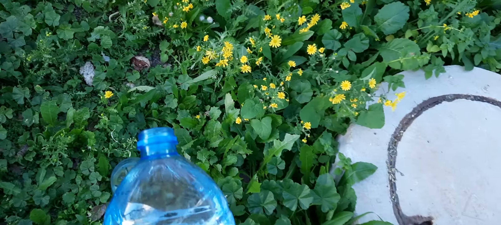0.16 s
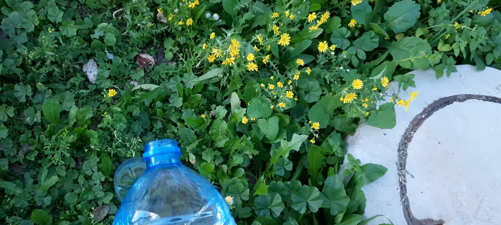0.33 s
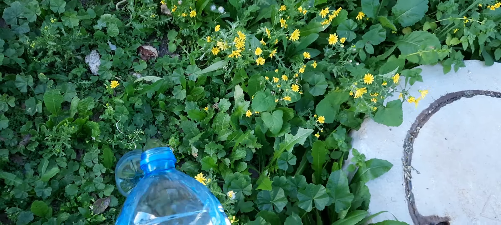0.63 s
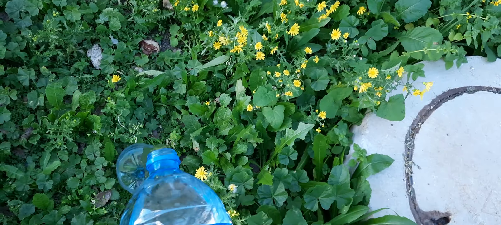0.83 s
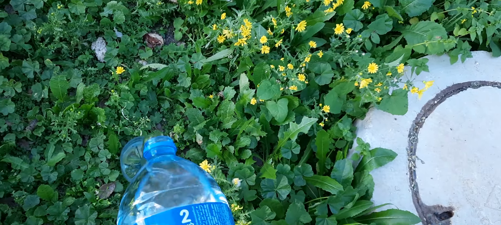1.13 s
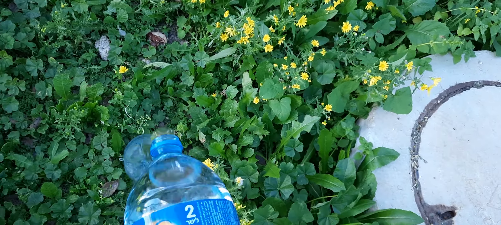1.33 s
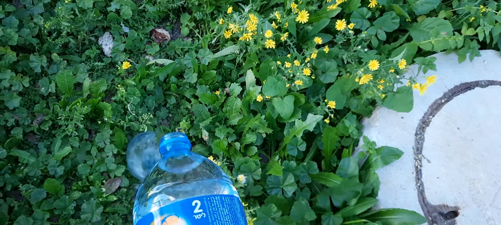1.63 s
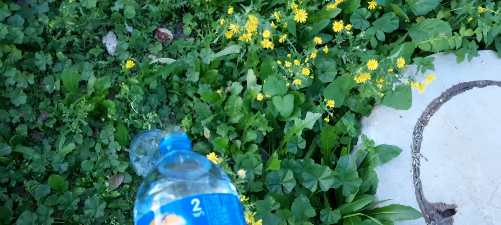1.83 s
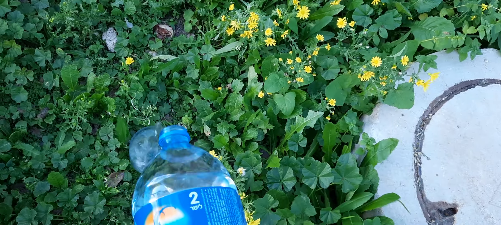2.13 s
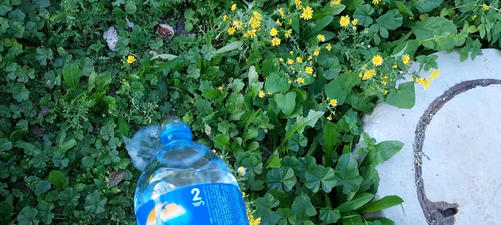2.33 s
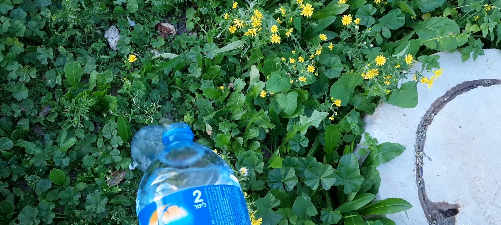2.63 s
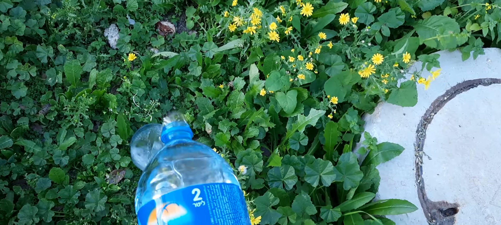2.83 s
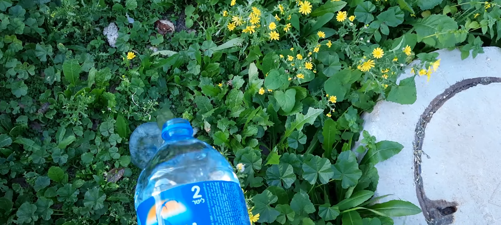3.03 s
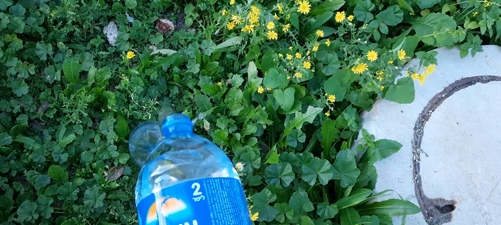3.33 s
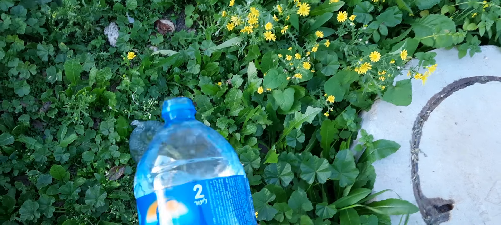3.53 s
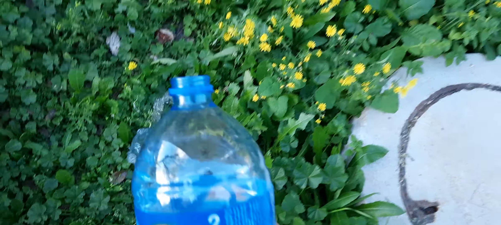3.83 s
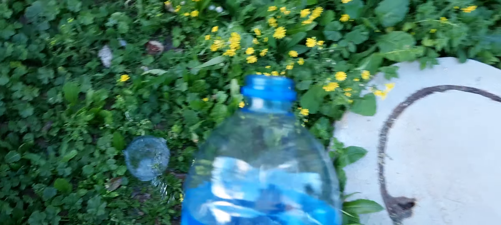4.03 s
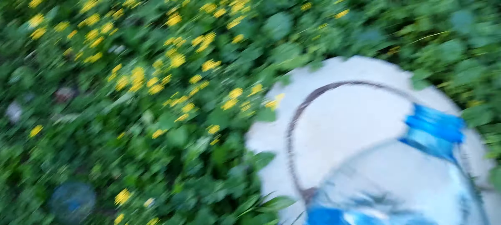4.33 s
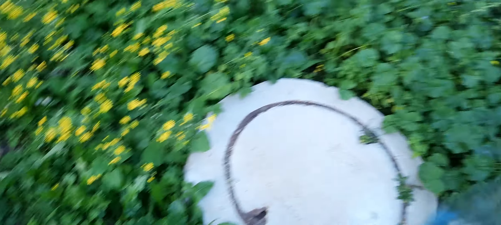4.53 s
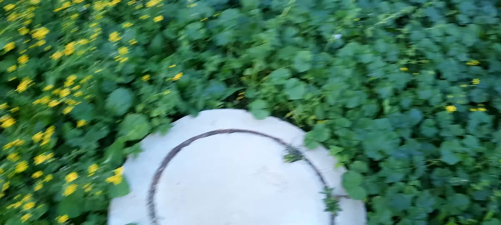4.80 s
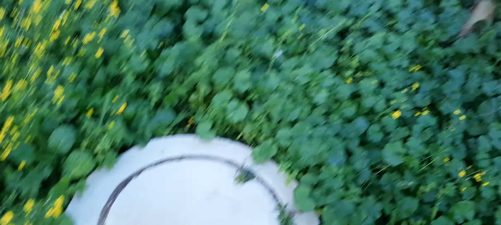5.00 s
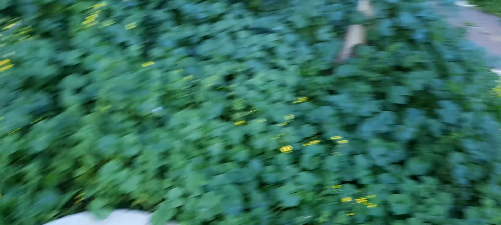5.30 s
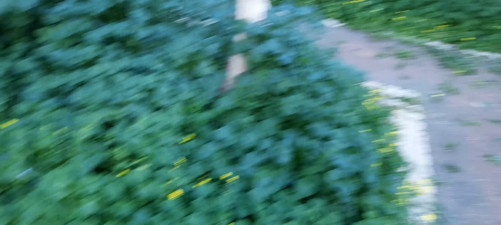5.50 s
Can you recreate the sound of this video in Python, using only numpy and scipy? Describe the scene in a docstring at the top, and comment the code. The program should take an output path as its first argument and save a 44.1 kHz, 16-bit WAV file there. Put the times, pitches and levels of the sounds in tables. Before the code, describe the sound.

Outdoors, quiet distant traffic and light wind lead into water pouring from a large plastic bottle into a small dish. Sharp splats come first, then uneven bubbly glugs, bright spray and droplets ticking on leaves. Low bumps join midway. A loud hollow plastic pop marks the end of the pour, then leaves rustle and a far engine rises. Close stereo microphone, water slightly left.

```python
"""Outdoors among leaves, a large plastic bottle is poured into a small dish close to a two-port microphone.
Bubbles are damped sines that rise in pitch; drops are bursts of bright noise and sharp pings, over a spray hiss.
The bottle pops back into shape as a set of ringing modes; wind on the ports is low noise, and wind and the
handled bottle give low thumps. Far off, traffic is filtered noise with narrow resonances; an engine pulls
away as a gliding note with a whirr."""
import sys
import numpy as np
from scipy import signal
from scipy.fft import rfft, irfft
from scipy.io import wavfile

SR = 44100
rng = np.random.default_rng(int(sys.argv[2]) if len(sys.argv) > 2 else 0)


def store_wav(level_fs):
    """Save 16-bit WAV to argv[1]."""
    pcm = np.round(np.clip(np.atleast_2d(level_fs), -1, 1) * 32767)
    wavfile.write(sys.argv[1], SR, pcm.T.astype(np.int16))


N = 249493

# Flow of the pour, as spray level: (time [s], level [dB])
POUR_FLOW = [(.82, -66.5), (1.03, -59), (1.08, -51.5), (1.18, -59.5), (1.26, -51), (1.47, -58), (1.53, -48),
             (1.65, -59), (1.85, -49.5), (2.1, -55.5), (2.2, -54.5), (2.32, -55), (2.6, -53.5),
             (2.72, -49.5), (2.82, -54.5), (3.03, -50.5), (3.13, -61), (3.22, -52), (3.32, -53.5),
             (3.46, -53.5), (3.85, -52), (3.96, -59), (4.1, -51), (4.2, -67)]
# Loudest bubbles, before the dish thins their bass: (time [s], level [dB], starting pitch [Hz])
LOUD_BUBBLES = [(1.078, -19, 1673), (1.0784, -17.5, 3200), (1.217, -27, 1500), (1.279, -24.5, 1490),
                (1.293, -35, 1770), (1.327, -28.5, 1450), (1.5427, -26.5, 2900), (1.554, -35, 2410),
                (1.586, -34, 1450), (1.603, -34, 1830), (1.647, -31.5, 1480), (1.858, -27, 1670),
                (1.911, -33, 1550), (1.983, -26.5, 2450), (2.0394, -25.5, 1470), (2.0663, -29.5, 2450),
                (2.1583, -21, 1770), (2.232, -26.5, 2860), (2.2407, -26.5, 2430), (2.275, -34.5, 1770),
                (2.3824, -26, 2030), (2.3946, -26.5, 2500), (2.6146, -27.5, 1530), (2.665, -32, 1500),
                (2.684, -31, 1440), (2.687, -31, 1750), (2.697, -29, 1460), (2.739, -30, 2460),
                (2.758, -27.5, 1750), (2.7828, -33, 2450), (2.9112, -28, 2530), (3.028, -22, 1420),
                (3.0732, -27, 1510), (3.112, -26, 1640), (3.187, -28, 2720), (3.262, -32.5, 1950),
                (3.306, -30, 1760), (3.32, -21.5, 1430), (3.3495, -33, 2440), (3.363, -28, 1504),
                (3.397, -27.5, 1390), (3.62, -26.5, 1620), (3.6546, -23, 1600), (3.8599, -23, 1600),
                (3.884, -28, 1450)]
# Clusters of bubbles in the dish, one to each glug: (start [s], hold [s], level [dB])
GLUGS = [(1.212, 0.033, -46), (1.249, 0.055, -44.5), (1.5, 0.0083, -44.5), (1.65, .01, -41.5),
         (1.81, 0.05, -48), (1.976, 0.041, -47), (2.16, 0.042, -48), (2.49, 0.053, -45.5),
         (2.662, 0.016, -39.5), (2.745, 0.028, -47), (2.835, 0.2, -48.5), (3.148, 0.017, -51),
         (3.257, 0.089, -44), (3.57, 0.085, -43.5), (3.693, 0.034, -46.5), (3.848, 0.04, -43),
         (4.015, 0.048, -42)]
# Pitches the dish favours for small bubbles: (share of bubbles below [0-1], pitch [Hz])
DISH_PITCHES = [(0, 1260), (.48, 1560), (.54, 1700), (.82, 1950), (.85, 2320), (.95, 2560), (1, 3100)]
# Dish modes that a loud bubble knocks: (pitch [Hz], mean level under the bubble [dB], t60 [s])
DISH_MODES = [(1485, -21.5, 0.022), (1764, -18, 0.04), (2430, -16, 0.018), (3070, -12, 0.0093)]
# Loudest splats: (time [s], level [dB], share of the top octave [dB])
SPLATS = [(0.8926, -31, 7), (0.914, -28.5, 2), (0.948, -27, 1), (0.9695, -32, 0), (1.0667, -32, 1),
          (1.078, -24.5, -7), (1.0998, -35, -5), (1.111, -31, 1), (1.1192, -35, -6), (1.1348, -27, -2),
          (1.291, -31, -4), (1.375, -30, -15), (1.3968, -30, -6), (1.4135, -26.5, 1), (1.451, -40, 0),
          (1.591, -25.5, -17), (1.6265, -26.5, -3), (1.653, -27.5, -8), (1.692, -30, -7), (1.713, -31, -3),
          (1.7941, -21, -3), (1.896, -42, 1), (1.9046, -22, -1), (2.131, -34.5, -4), (2.2027, -19.5, -6.5),
          (2.241, -17, 3.5), (2.305, -34, 0), (2.32, -30.5, -10), (2.475, -30, -10), (2.5327, -28.5, -27),
          (2.598, -31, 1), (2.606, -33, -0.5), (2.7124, -24.5, -23), (2.8987, -28, -1),
          (3.1757, -29.5, -25), (3.2514, -39, -2), (3.281, -27.5, -8), (3.3313, -26, 0), (3.3653, -36, 0),
          (3.42, -47, 2), (3.498, -26, 4), (3.524, -27, 0), (3.5452, -32, 1), (3.677, -23.5, -2.5),
          (3.751, -37, -14), (3.896, -30.5, 10), (3.916, -33, 1), (3.928, -33, 0), (3.942, -30.5, -6),
          (3.978, -31, 1), (4.03, -19, -6), (4.057, -39, -1), (4.1506, -31.5, -6)]
# Colour of bursting drops: (frequency [Hz], relative level per Hz [dB])
SPRAY_COLOUR = [(900, -33), (2000, -0.5), (3500, 0.5), (5500, 4.5), (6400, -3), (7600, 6.5), (8500, 3),
                (9200, -17), (12000, -3), (14000, -2.5), (15600, -4.5)]
# Snaps of the bottle wall: (time [s], level [dB], brightness [dB per octave], low-mode level [dB])
BOTTLE_POPS = [(1.508, -34, 8, 2), (1.522, -33, -3, 7.5), (3.7071, -23, 7.5, -11), (4.0607, -8.5, -2, -5.5)]
# Modes of the bottle: (pitch [Hz], relative level [dB], t60 [s])
BOTTLE_MODES = [(306, -9, 0.051), (1100, 2, 0.0029), (1400, -3.5, 0.01), (1910, -6, 0.008),
                (2220, -5, 0.008), (3090, 1, 0.0027)]
# Wind on the ports: (time [s], relative level [dB])
WIND_FLOW = [(0, -55.5), (.37, -62), (.43, -46), (.68, -50), (.78, -60), (1.0, -51), (1.33, -51.5),
             (1.46, -64), (1.51, -45), (1.75, -54.5), (1.9, -46), (2.14, -58), (2.4, -52.5), (2.88, -42.5),
             (3.4, -44), (3.65, -48.5), (3.85, -43.5), (4.2, -50.5), (5.66, -53)]
# Low thumps, of wind and of the handled bottle:
# (time [s], peak level [dB], pitch at the peak [Hz], width of the rise [s])
LOW_THUMPS = [(1.52, -41, 60.4, 0.008), (2.735, -34, 102, 0.0035), (2.879, -19.5, 100.5, 0.0057),
              (3.051, -34, 70.4, 0.0088), (3.328, -29, 138, 0.0071), (3.366, -21, 150, 0.0019),
              (3.384, -27.5, 87.5, 0.0075), (3.476, -24, 111, 0.0011), (3.494, -23, 114, 0.0051),
              (3.555, -27, 104, 0.0049), (3.802, -35, 55.7, 0.022), (3.838, -23, 259, 0.007),
              (3.858, -17.5, 420, 0.0022), (3.861, -30.5, 122, 0.0062), (4.05, -29, 74, 0.008),
              (4.108, -27, 295, 0.004), (5.553, -33, 61.6, 0.018)]
# Engine note that dips, climbs and drops back: (time [s], pitch [Hz], level [dB])
ENGINE_CLIMB = [(3.65, 58, -52), (3.762, 55.8, -46), (3.89, 54.2, -48.5), (4.332, 60.34, -30.5),
                (4.726, 63.9, -37), (5.312, 69.74, -38), (5.45, 64.4, -29)]
# Engine note that joins later: (time [s], pitch [Hz], level [dB])
ENGINE_JOIN = [(4.85, 86.6, -49), (5.04, 90.8, -38), (5.538, 90.86, -31.5), (5.657, 96.3, -37)]
# Engine overtones: (multiple of the note [1], mean level under the note [dB])
ENGINE_OVERTONES = [(2, -19), (3, -21.5), (4, -33)]
# Tyre whirr of the vehicle pulling away: (time [s], centre pitch [Hz], relative level [dB])
PASSING = [(4.15, 1049, -64), (4.5, 1020, -56), (4.9, 863, -56.5), (5.3, 850, -56), (5.66, 824, -67)]
# Leaves rustle as the walker turns away: (time [s], mean level [dB])
LEAF_RUSTLE = [(4.17, -63), (4.31, -50.5), (4.44, -61.5), (4.77, -60.5), (5.07, -62.5), (5.36, -50),
               (5.57, -53), (5.63, -59)]
# Far traffic: (time [s], relative drone level [dB], relative tyre hiss level [dB])
FAR_TRAFFIC = [(0, -59.5, -53.5), (.5, -49, -54), (1.0, -55.5, -53.5), (1.5, -51.5, -53.5), (2.3, -47, -51),
               (3.0, -50, -51), (3.8, -47, -50), (4.2, -47.5, -52), (4.5, -46.5, -51), (5.0, -47.5, -50.5),
               (5.4, -47.5, -50), (5.66, -51.5, -49)]
# Colour of the traffic roar: (frequency [Hz], relative level per Hz [dB])
ROAR_COLOUR = [(18, -57.5), (30, -62), (70, -1), (149, -28.5), (364, 3.5), (649, -22), (801, -22.5),
               (3490, -32.5), (8300, -28.5), (9220, -48), (13000, -35.5), (16000, -64)]
# Droning resonances: (frequency [Hz], width [Hz], mean level [dB])
DRONE_MODES = [(208.2, 16.3, -8), (294.4, 9.4, -7), (379, 5, -8.5), (438, 70, -11.5), (817, 16, -18),
               (841, 9.9, -22.5)]
# Left-right likeness of far sound: (frequency [Hz], likeness [0-1])
PORT_LIKENESS = [(60, 0.21), (130, 0.58), (290, 1), (640, 0.43), (1400, 0.0092), (8000, 0.01)]
# Colours of wind, tyre hiss, a separately swelling low band of it, and leaves:
# (frequency [Hz], relative level per Hz [dB])
WIND_COLOUR = [(20, -16), (35, -40), (50, 3.5), (85, 1.0), (150, -4.5), (300, -11.0), (800, -55.5)]
TYRE_COLOUR = [(120, -2.5), (250, -0.5), (500, -4.0), (900, -6.5), (1500, -9.5), (3000, -16.0), (6000, -34.5)]
SWELL_COLOUR = [(250, -28), (550, -7), (800, 5.5), (1150, -8.0), (1600, -19.5)]
LEAF_COLOUR = [(1500, -45), (4000, 2.5), (8000, 4.5), (9300, -4.0), (12000, 2.0), (15500, -0.5)]
SPRAY_EDGES_HZ = [900, 2900, 4400, 6400, 8900, 19500]

PORT_LAG_S, WATER_PAN_DB = 0.00012, 2   # the water is nearer the left port
DISH_EDGE_HZ = 1454   # the small dish radiates little below this
SNAP_DB = -6   # pinch-off of a loud bubble, under its ring
GLUG_ATTACK_S, GLUG_FADE_DB_PER_S = 0.0068, 279
TRICKLE_DB, TRICKLE_START_S, TRICKLE_END_S = -55, 1.2, 4.12   # thin bubbling between the glugs
TICK_DB, TICK_T60_S = 0, 0.0028   # sharp first contact of a splat
TICK_HZ = (7200, 13360)   # nominal tick pitch below and in the top octave
SPATTER_PER_S, SPATTER_DB = 70, -1.5   # nominal rate of lone droplets on leaves, level over the spray
SPATTER_LOW_HZ, SPATTER_HIGH_HZ = 2900, 13900   # range of starting pitch
BODY_HZ = 1230   # modes under this belong to the whole bottle, those above to the dent
THUMP_TAIL, THUMP_SAG = 1.14, 0.07   # fall over rise; pitch sag as a fraction
TOP_EDGE_HZ, CUTOFF_HZ = 15700, 16979


def gurgle(per_s, size_db):
    """Small bubbles crowd under the loudest ones; the dish radiates their treble better than their bass."""
    water = small_bubbles(per_s, size_db) + loud_bubbles()
    return signal.sosfilt(signal.butter(3, DISH_EDGE_HZ, "high", fs=SR, output="sos"), water)


def small_bubbles(per_s, size_db):
    """Overlapping bubble rings, mostly near the dish's favoured pitches, follow the glugs."""
    small = np.zeros(N)
    for when, size, pitch, ring in rng.random((round(6 * per_s), 4)):
        hz = np.interp(pitch, *np.transpose(DISH_PITCHES))
        cycles = 6 + 20 * ring ** 2
        one = bubble(hz, cycles / hz, 0.08)
        add(small, when * (N - 1) / SR, amp(-size_db * np.log(size + 0.023)) * one)
    return rms_one(small) * bubbling() * amp(4.1 * drift(22))


def loud_bubbles():
    """Each large bubble rings, knocks the dish modes and pinches off with a short, higher snap."""
    out = np.zeros(N)
    for s, db, hz in LOUD_BUBBLES:
        add(out, s, amp(db) * bubble(hz, 28.7 / hz, 0.036, attack_s=0.00049))
        for wall_hz, wall_db, t60 in DISH_MODES:
            knock = bubble(wall_hz, t60, 0, attack_s=0.0001)
            add(out, s, amp(db + wall_db + rng.normal(0, 3.8)) * knock)
        snap = bubble(2.43 * hz, 12.0 / hz, 0.3, attack_s=0.0001)
        add(out, s, amp(db + SNAP_DB) * snap)
    return out


def bubble(hz, t60, rise, attack_s=0.0002):
    """A damped sine whose pitch rises as the bubble nears the surface; with no rise, a struck mode."""
    t = np.arange(round(t60 * SR)) / SR
    envelope = (1 - np.exp(-t / attack_s)) * amp(-60 * t / t60)
    return envelope * np.sin(2 * np.pi * hz * t * (1 + rise * t / t60))


def bubbling():
    """Gain of the small bubbles: each glug swells quickly, holds and dies away over a thin trickle."""
    t = np.arange(N) / SR
    power = amp(TRICKLE_DB) ** 2 * (t > TRICKLE_START_S) * (t < TRICKLE_END_S)
    for s, hold_s, db in GLUGS:
        after = np.maximum(t - s - GLUG_ATTACK_S - hold_s, 0)
        swell = np.clip((t - s) / GLUG_ATTACK_S, 0, 1)
        power = power + (swell * amp(db - GLUG_FADE_DB_PER_S * after)) ** 2
    return np.sqrt(power)


def falling_water(scatter_db, decay_s):
    """Spray, splats and lone droplets near the left port, with scattered sound at both ports."""
    bands = drop_bands(scatter_db)
    pings = near(splat_ticks() + spatter(), PORT_LAG_S, WATER_PAN_DB)
    return spray(bands) + splats(bands, decay_s) + pings


def drop_bands(scatter_db):
    """Bright noise of bursting drops, direct and thrown back by leaves, split into five bands."""
    scattered = np.array([noise(SPRAY_COLOUR), noise(SPRAY_COLOUR)])   # differs at each port
    source = near(noise(SPRAY_COLOUR), PORT_LAG_S, WATER_PAN_DB) + amp(scatter_db) * scattered
    bands = []
    for edge in zip(SPRAY_EDGES_HZ, SPRAY_EDGES_HZ[1:]):
        bands.append(signal.sosfilt(signal.butter(3, edge, "band", fs=SR, output="sos"), source))
    return bands


def spray(bands):
    """Drops burst as quickly dying noise; small drops light up only part of the treble."""
    broad, out = drops(per_s=290.0, size_db=2.0, decay_s=0.0027), 0
    gain = pour_gain()
    for band in bands:
        own = drops(per_s=220.0, size_db=2.0, decay_s=0.0041)
        patter = 0.92 * broad + 1.26 * own + 0.073   # the constant is a steady hiss
        out = out + band * gain * patter * amp(1.6 * drift(13))
    return out


def pour_gain():
    """Spray gain that follows the flow of water."""
    return amp(in_time(POUR_FLOW)[0]) * sounding(POUR_FLOW, 0.043)


def drops(per_s, size_db, decay_s):
    """Envelope of random bursts that start suddenly and die fast."""
    sizes = amp(size_db * np.minimum(rng.exponential(1, N), 4)) * (rng.random(N) < per_s / SR)
    return rms_one(signal.lfilter([1], [1, -np.exp(-1 / (decay_s * SR))], sizes))


def splats(bands, decay_s):
    """A splat cracks at once, then fizzes away four times more slowly, with its own share of treble."""
    t = np.arange(round(30 * decay_s * SR)) / SR
    crack_and_fizz = np.exp(-t / decay_s) + 0.14 * np.exp(-t / (4 * decay_s))
    burst = 0.72 * (1 - np.exp(-t / 0.00069)) * crack_and_fizz
    low_hits, high_hits = np.zeros((2, N))
    for s, db, high_db in SPLATS:
        low_share, high_share = splat_shares(high_db)
        add(low_hits, s, amp(db) * low_share * burst)
        add(high_hits, s, amp(db) * high_share * burst)
    low_noise = rms_one(0.51 * bands[1] + 1.0 * bands[2] + bands[3])
    return low_noise * low_hits + rms_one(bands[4]) * high_hits


def splat_shares(high_db):
    """Amplitudes below and in the top octave that keep a splat's power whole."""
    high_share = np.clip(amp(high_db), 0, 0.97)
    return np.sqrt(1 - high_share ** 2), high_share


def splat_ticks():
    """First contact of each splat rings very briefly at two high pitches."""
    ticks = np.zeros(N)
    for s, db, high_db in SPLATS:
        for hz, share in zip(TICK_HZ, splat_shares(high_db)):
            tick = bubble(hz * rng.uniform(0.75, 1.06), TICK_T60_S, 0, attack_s=0.00003)
            add(ticks, s, amp(db + TICK_DB) * share * tick)
    return ticks


def spatter():
    """Lone droplets on leaves: short sharp pings of uneven size at scattered pitches, following the pour."""
    out = np.zeros(N)
    for when, size, pitch, ring in rng.random((round(6 * SPATTER_PER_S), 4)):
        hz = SPATTER_LOW_HZ * (SPATTER_HIGH_HZ / SPATTER_LOW_HZ) ** pitch
        ping = bubble(hz, (4 + 14 * ring) / hz, 0.15, attack_s=0.00004)
        add(out, when * (N - 1) / SR, amp(-3.5 * np.log(size + 0.02)) * ping)
    return pour_gain() * amp(SPATTER_DB) * rms_one(out) * amp(3.4 * drift(7.5))


def bottle_pops():
    """The dented wall snaps and rings its modes; each snap has its own share of low body modes."""
    body, dent = np.zeros((2, N))
    for s, pop_db, bright_db, body_db in BOTTLE_POPS:
        for hz, db, t60 in BOTTLE_MODES:
            whole = hz < BODY_HZ
            tilt_db = body_db if whole else bright_db * np.log2(hz / 1500)
            ring = bubble(hz, t60, 0, attack_s=0.0001)
            add(body if whole else dent, s, -amp(pop_db + db + tilt_db) * ring)
    return body + signal.sosfilt(signal.butter(1, BODY_HZ / 2, "high", fs=SR, output="sos"), dent)


def low_thumps():
    """Low thumps, of wind and of the handled bottle, die more slowly than they rise and sag in pitch."""
    t, out = np.arange(N) / SR, np.zeros((2, N))
    for s, db, hz, width in LOW_THUMPS:
        age = t - s - np.array([[0], [0.0011]])   # the right port hears it later [s]
        spread = np.where(age > 0, THUMP_TAIL * width, width)
        envelope = np.exp(-(age / spread) ** 2 / 2)
        sag = 1 - THUMP_SAG * np.tanh(age / width)
        out -= amp(db) * envelope * np.cos(2 * np.pi * hz * age * sag)
    return out


def wind():
    """Lumpy low noise on the ports, partly its own at each."""
    level_db = in_time(WIND_FLOW)[0]
    shared = noise(WIND_COLOUR)
    left, right = shared + 1.0 * noise(WIND_COLOUR), shared + 1.37 * noise(WIND_COLOUR)
    return amp(level_db + 2.0 * drift(7.6)) * np.array([left, right])


def engine(rows):
    """A low firing note with weak, fluttering overtones."""
    hz, db = in_time(rows)
    phase = 2 * np.pi * np.cumsum(hz) / SR
    note = np.sqrt(2) * np.sin(phase + 0.33 * drift(28))
    for k, over_db in ENGINE_OVERTONES:
        overtone = np.sqrt(2) * np.sin(k * phase + 0.49 * drift(8.2))
        note = note + amp(over_db + 4.0 * drift(13.5)) * overtone
    return note * amp(db) * np.clip((np.arange(N) / SR - rows[0][0]) / 0.055, 0, 1)


def whirr(width_hz):
    """A band of noise that sinks in pitch as the vehicle leaves."""
    hz, db = in_time(PASSING)
    phase = 2 * np.pi * np.cumsum(hz) / SR
    band = drift(width_hz) * np.cos(phase) + drift(width_hz) * np.sin(phase)
    return band * amp(db) * np.clip((np.arange(N) / SR - PASSING[0][0]) * 10, 0, 1)


def leaves():
    """Leaves rustle as the walker moves: bright noise, independent at each port."""
    rustle = np.array([noise(LEAF_COLOUR), noise(LEAF_COLOUR)])
    return rustle * amp(in_time(LEAF_RUSTLE)[0] + drift(23.1)) * sounding(LEAF_RUSTLE, 0.01)


def traffic():
    """Far roar, drone and tyre hiss arrive as diffuse noise, with a low band of hiss swelling on its own."""
    drone_db, tyres_db = in_time(FAR_TRAFFIC)
    roar = diffuse(noise(ROAR_COLOUR), noise(ROAR_COLOUR)) * amp(-48.5)
    hum = diffuse(drone(), drone()) * amp(drone_db + 4.5)
    tyres = diffuse(noise(TYRE_COLOUR), noise(TYRE_COLOUR)) * amp(tyres_db + 1.15 + drift(4))
    swell = diffuse(noise(SWELL_COLOUR), noise(SWELL_COLOUR)) * amp(tyres_db - 10.0 + 3.2 * drift(7.3))
    return roar + hum + tyres + swell


def drone():
    """Noise through narrow resonances, each wavering on its own."""
    out = 0
    for hz, width, db in DRONE_MODES:
        r = np.exp(-np.pi * width / SR)
        poles = [1, -2 * r * np.cos(2 * np.pi * hz / SR), r * r]
        ring = signal.lfilter([1, 0, -1], poles, rng.standard_normal(N))
        out = out + amp(db + 2.63 * drift(2.7)) * rms_one(ring)
    return out


def near(x, lag_s, pan_db):
    """A close source: a positive lag delays the right port, a positive pan favours the left."""
    turn = np.exp(-2j * np.pi * np.fft.rfftfreq(N, 1 / SR) * lag_s)
    return np.array([x * amp(pan_db / 2), irfft(rfft(x) * turn, N) * amp(-pan_db / 2)])


def diffuse(mid, side):
    """Far sound: the ports agree most around the low mids and differ in the treble."""
    alike = np.clip(at_hz(PORT_LIKENESS, np.fft.rfftfreq(N, 1 / SR)), 0, 1)
    mid = rfft(mid) * np.sqrt((1 + alike) / 2)
    side = rfft(side) * np.sqrt((1 - alike) / 2)
    return irfft([mid + side, mid - side], N)


def noise(spectrum):
    """Noise of a given spectrum, rms 1."""
    hz = np.fft.rfftfreq(N, 1 / SR)
    return rms_one(irfft(rfft(rng.standard_normal(N)) * amp(at_hz(spectrum, hz)), N))


def drift(hz):
    """Slow random wandering of spread 1, made at a tenth of the sample rate."""
    r = np.exp(-20 * np.pi * hz / SR)
    slow = signal.lfilter([1], [1, -2 * r, r * r], rng.standard_normal(N // 10 + 4002))[4000:]
    return np.interp(np.arange(N) / 10, np.arange(len(slow)), rms_one(slow - slow.mean()))


def amp(db):
    """dB to gain."""
    return 10 ** (np.asarray(db) / 20)


def rms_one(x):
    """Scale to rms 1."""
    return x / np.sqrt(np.mean(x ** 2) + 1e-20)


def in_time(rows):
    """Table columns as per-sample curves."""
    s, *columns = np.transpose(rows)
    return [np.interp(np.arange(N) / SR, s, c) for c in columns]


def sounding(rows, fade_s):
    """Gain that fades in and out at the ends of a table."""
    t = np.arange(N) / SR
    return np.clip(np.minimum(t - rows[0][0], rows[-1][0] - t) / fade_s, 0, 1)


def at_hz(points, hz):
    """A spectrum read on a log-frequency axis."""
    point_hz, values = np.transpose(points)
    return np.interp(np.log(hz + 1), np.log(point_hz), values)


def add(out, s, sound):
    """Mix a short sound in at time s."""
    i = round(s * SR)
    out[i:i + len(sound)] += sound[:N - i]


def scene():
    """Water close on the left, low thumps and wind at the ports, traffic all round."""
    water = near(gurgle(per_s=850.0, size_db=3.5), PORT_LAG_S, WATER_PAN_DB)
    water = water + falling_water(scatter_db=-1.0, decay_s=0.0015)
    bottle = near(bottle_pops(), 0.00009, 3.3)
    motor = engine(ENGINE_CLIMB) * sounding(ENGINE_CLIMB, 0.16) + engine(ENGINE_JOIN)
    vehicle = near(motor, -0.00056, 0.54)   # reaches the right port first
    vehicle = vehicle + diffuse(whirr(width_hz=70.0), whirr(width_hz=70.0))
    return water + bottle + low_thumps() + wind() + vehicle + leaves() + traffic()


def record(dry):
    """The top is dulled above 15.7 kHz and cut at 17 kHz."""
    dulled = signal.sosfilt(signal.ellip(7, 0.5, 24, TOP_EDGE_HZ, fs=SR, output="sos"), dry)
    return signal.sosfilt(signal.cheby2(16, 60, CUTOFF_HZ, fs=SR, output="sos"), dulled)


dry = scene()
out = record(dry)
store_wav(out)
```